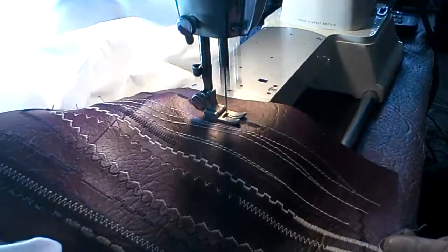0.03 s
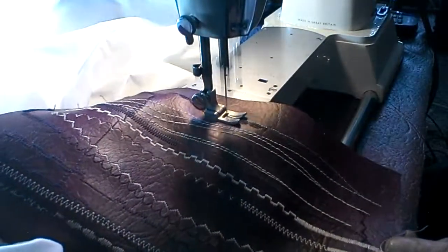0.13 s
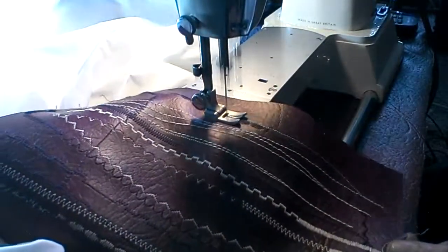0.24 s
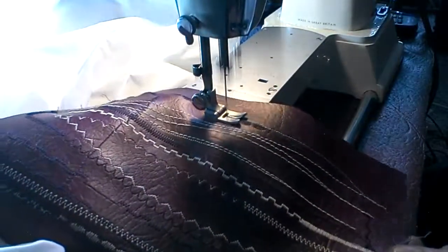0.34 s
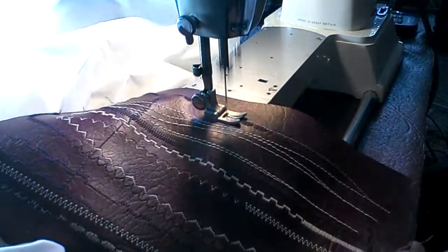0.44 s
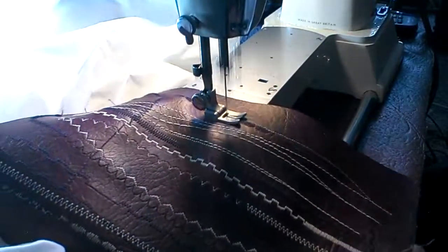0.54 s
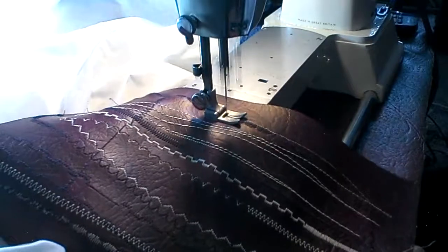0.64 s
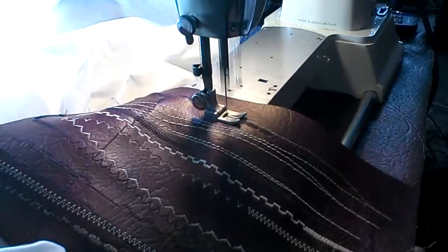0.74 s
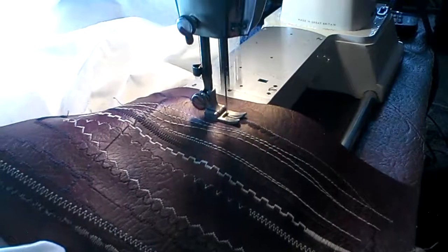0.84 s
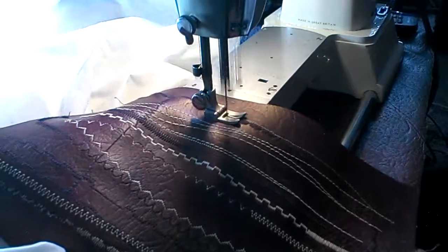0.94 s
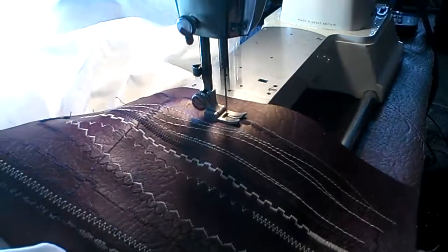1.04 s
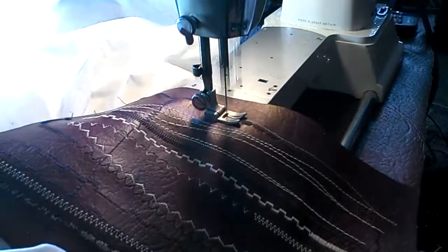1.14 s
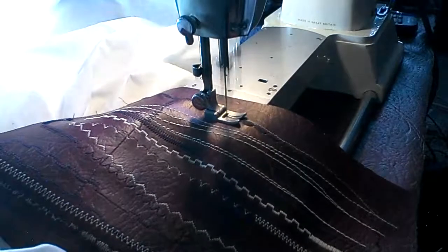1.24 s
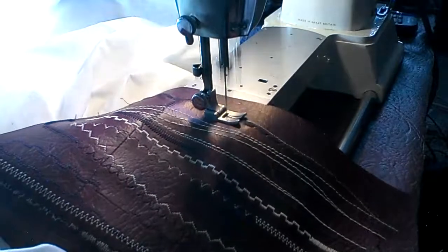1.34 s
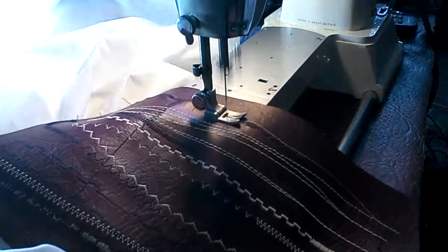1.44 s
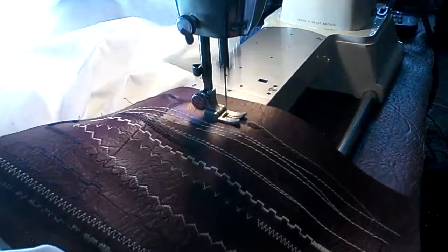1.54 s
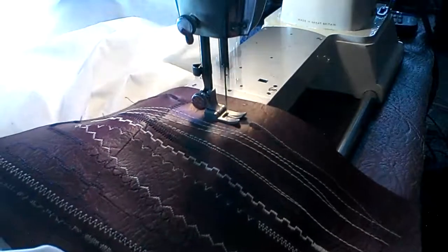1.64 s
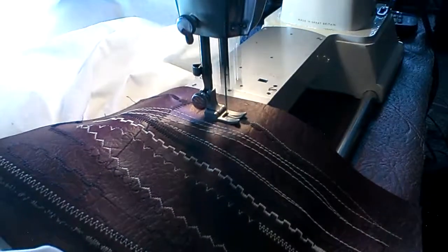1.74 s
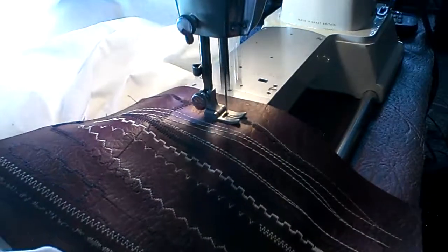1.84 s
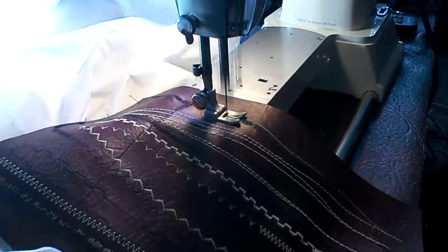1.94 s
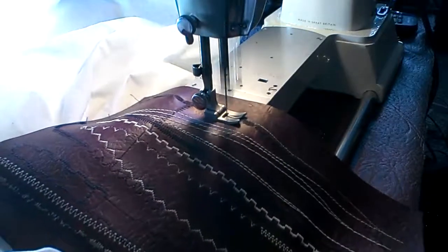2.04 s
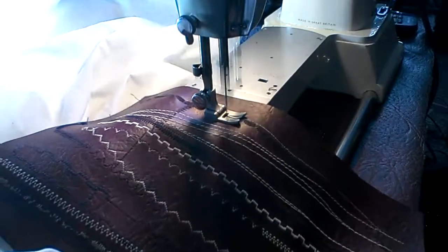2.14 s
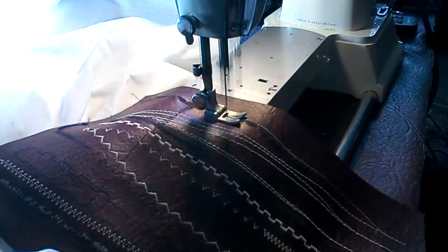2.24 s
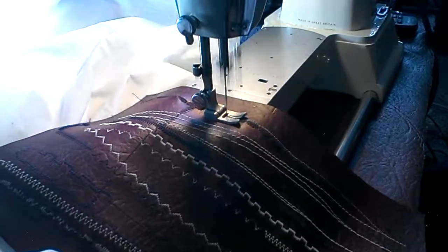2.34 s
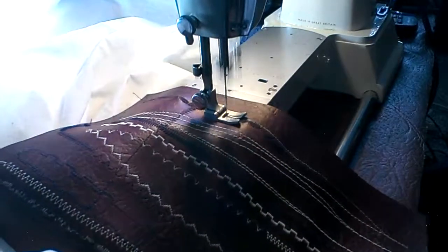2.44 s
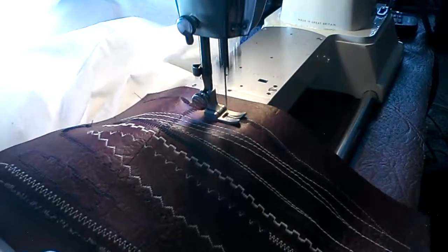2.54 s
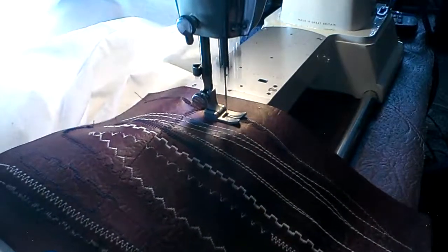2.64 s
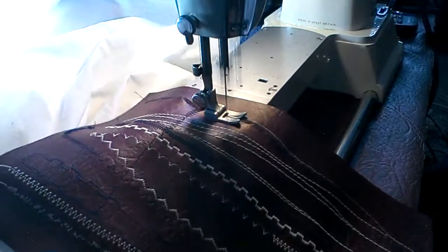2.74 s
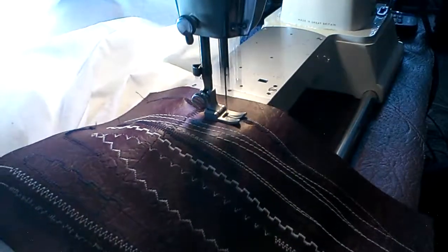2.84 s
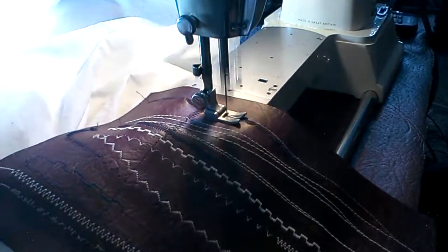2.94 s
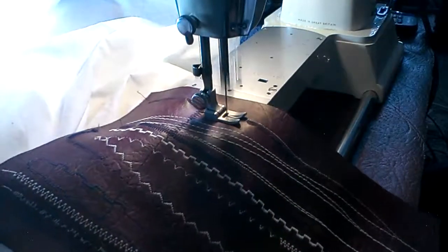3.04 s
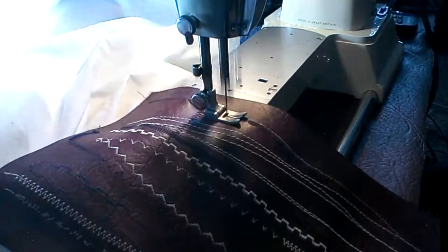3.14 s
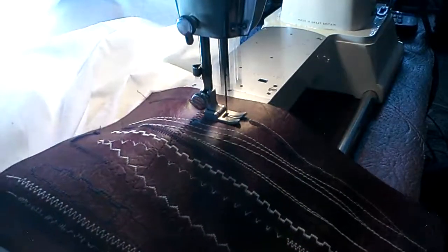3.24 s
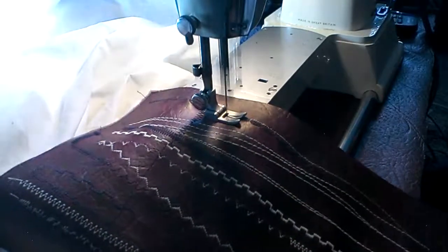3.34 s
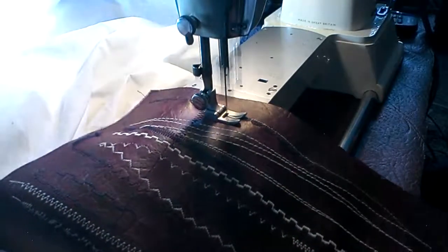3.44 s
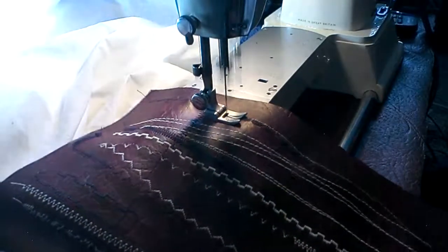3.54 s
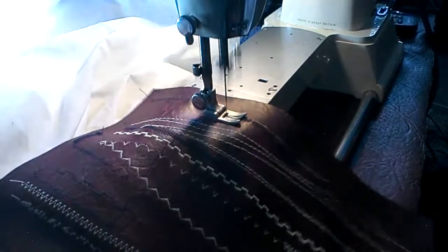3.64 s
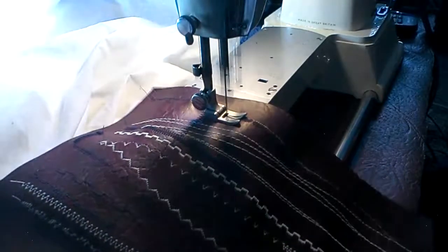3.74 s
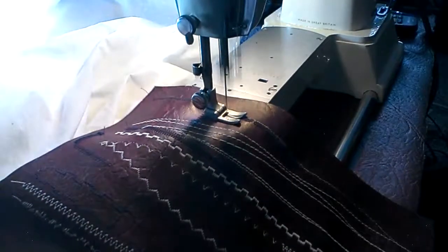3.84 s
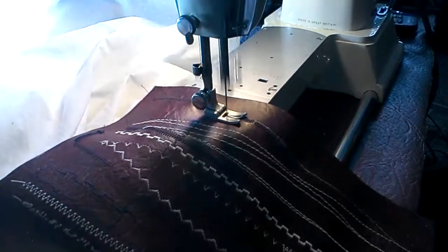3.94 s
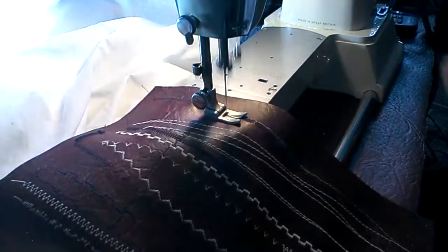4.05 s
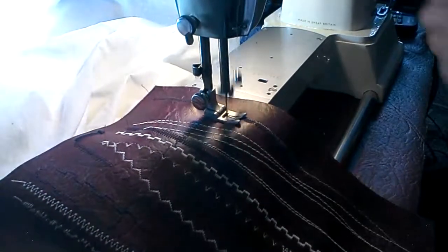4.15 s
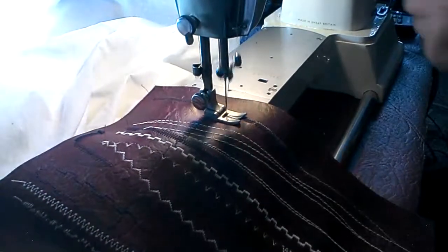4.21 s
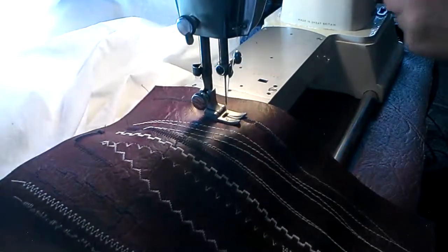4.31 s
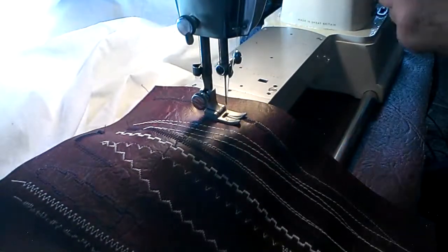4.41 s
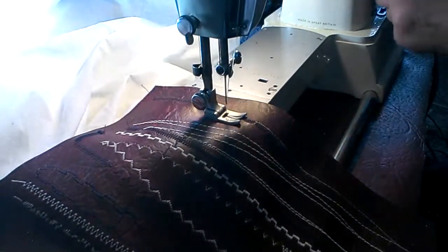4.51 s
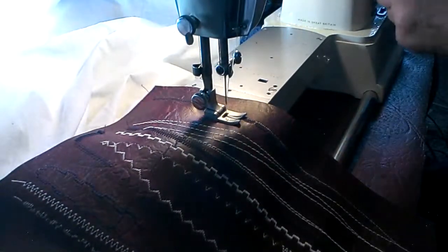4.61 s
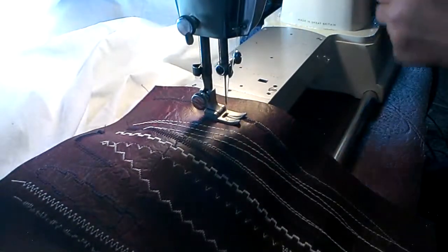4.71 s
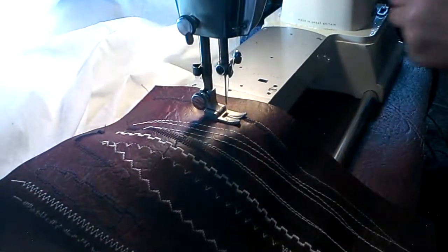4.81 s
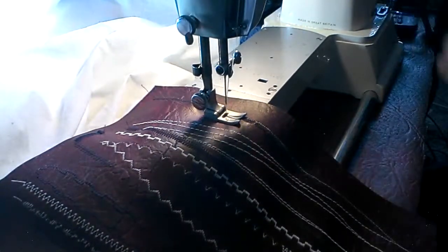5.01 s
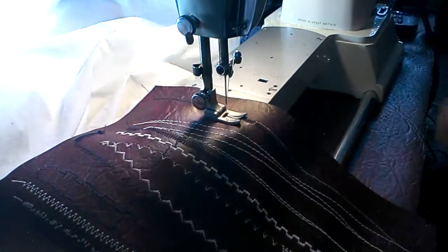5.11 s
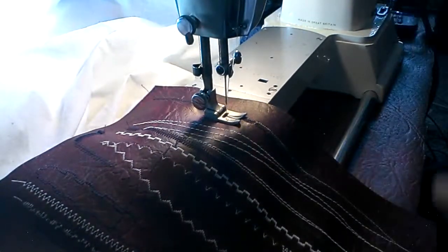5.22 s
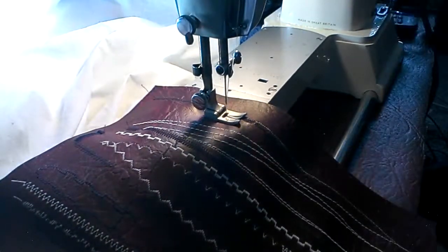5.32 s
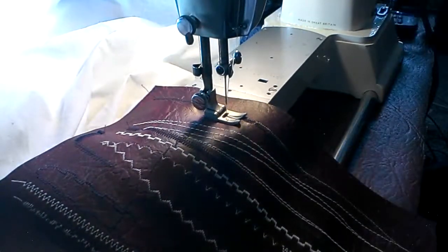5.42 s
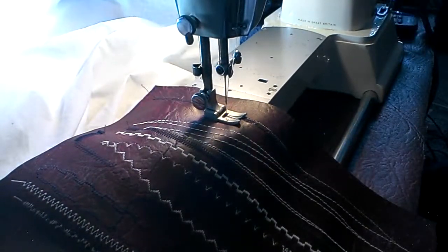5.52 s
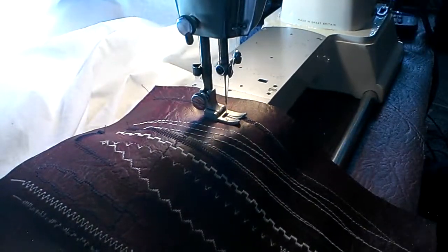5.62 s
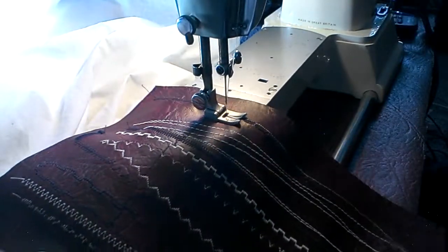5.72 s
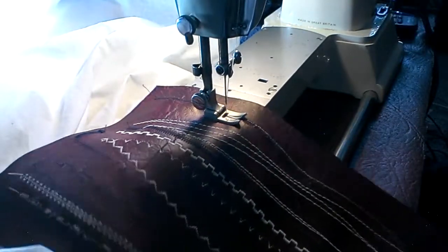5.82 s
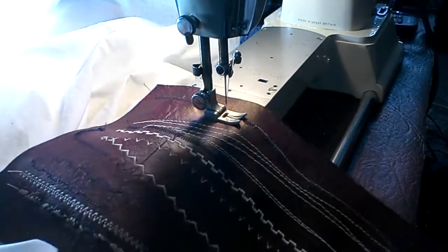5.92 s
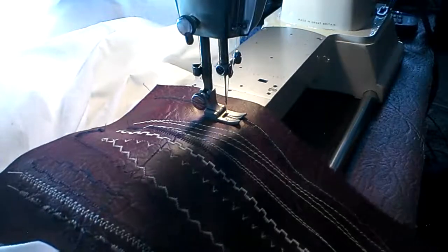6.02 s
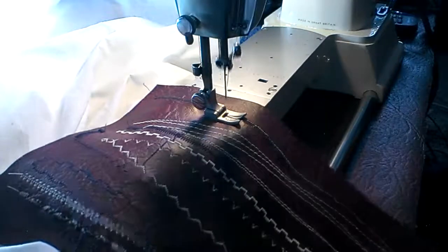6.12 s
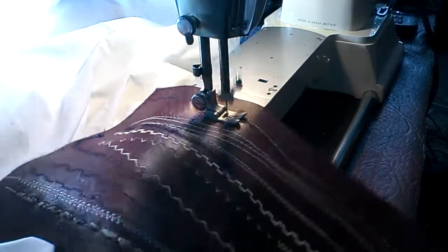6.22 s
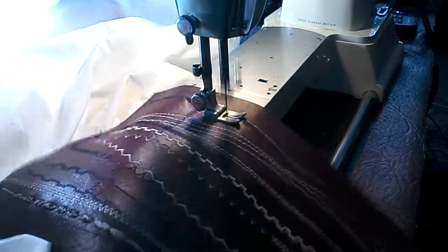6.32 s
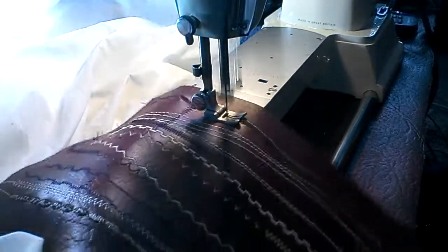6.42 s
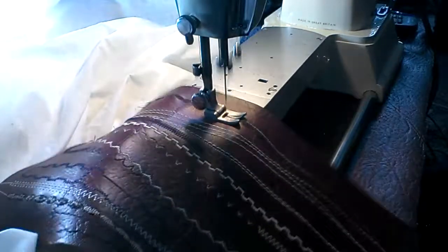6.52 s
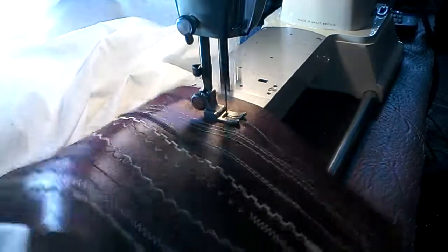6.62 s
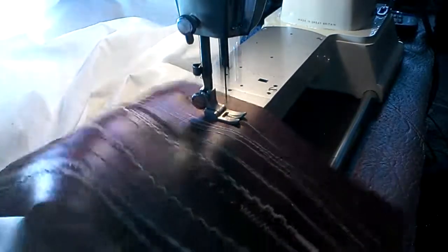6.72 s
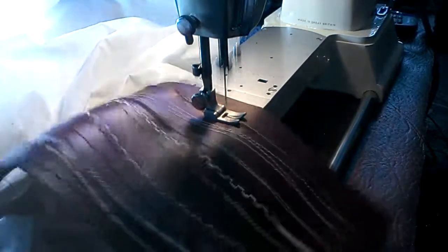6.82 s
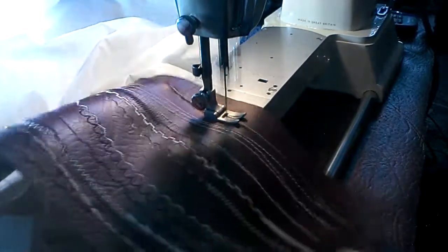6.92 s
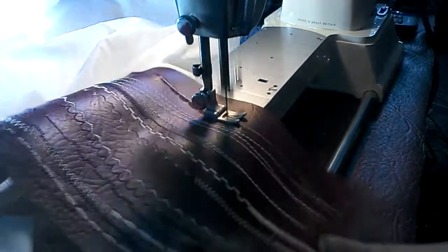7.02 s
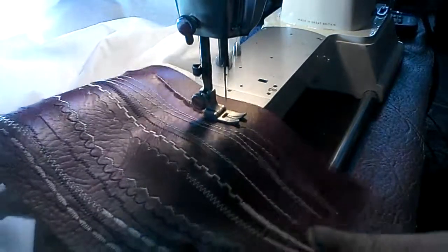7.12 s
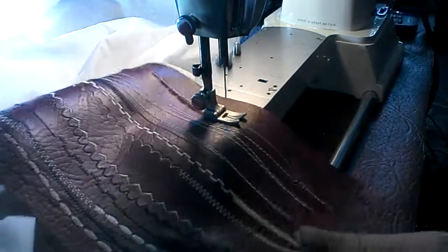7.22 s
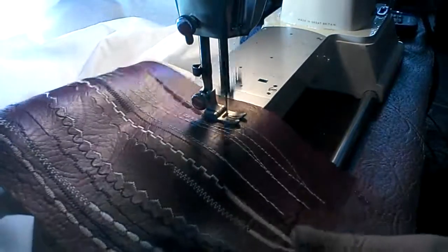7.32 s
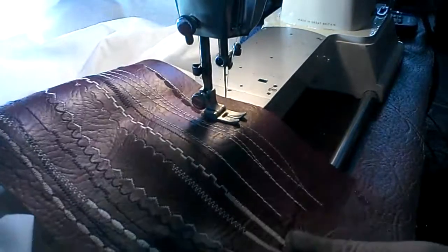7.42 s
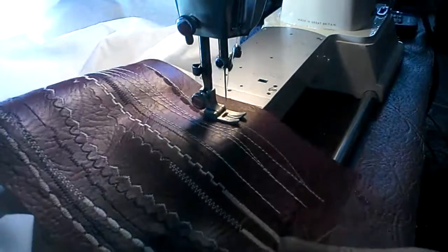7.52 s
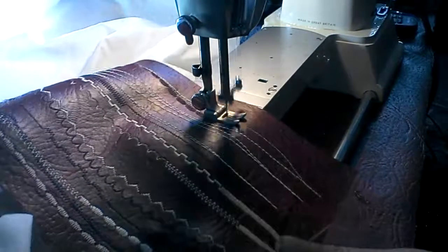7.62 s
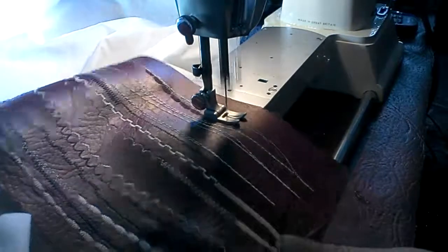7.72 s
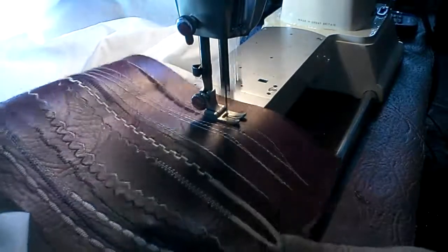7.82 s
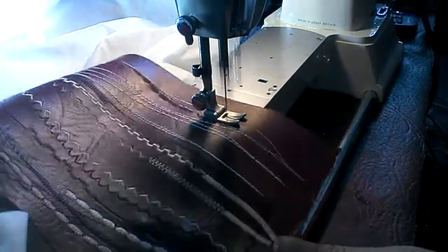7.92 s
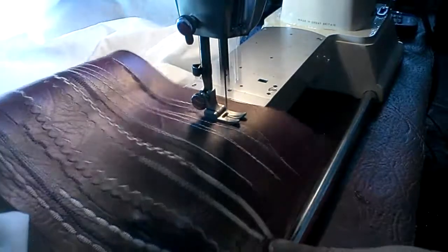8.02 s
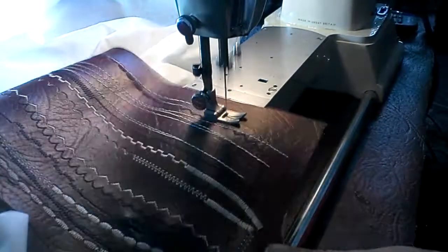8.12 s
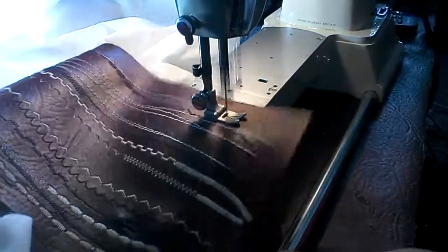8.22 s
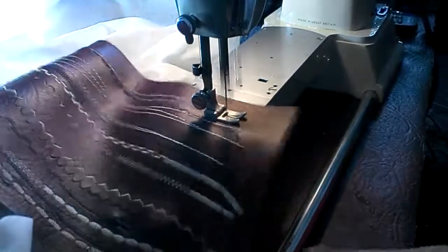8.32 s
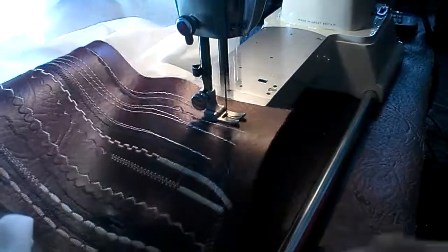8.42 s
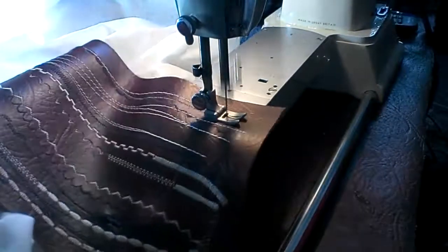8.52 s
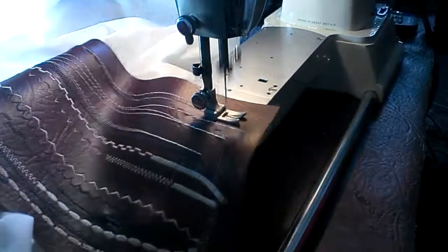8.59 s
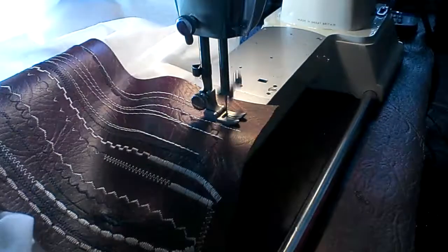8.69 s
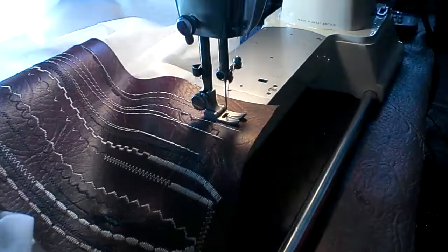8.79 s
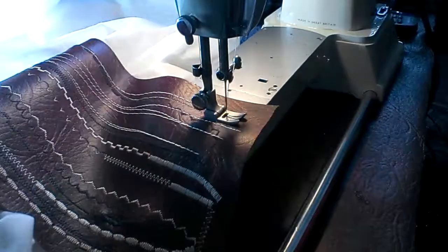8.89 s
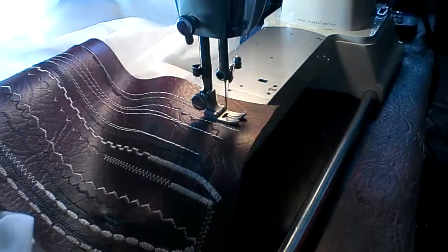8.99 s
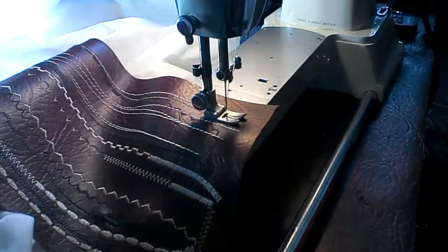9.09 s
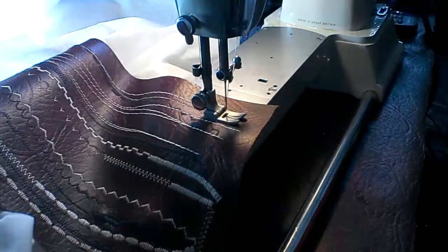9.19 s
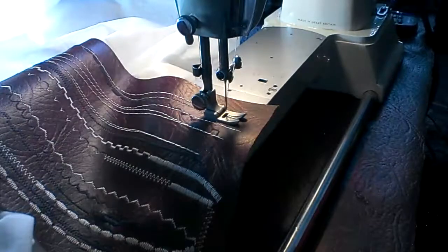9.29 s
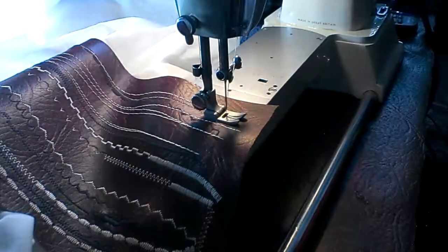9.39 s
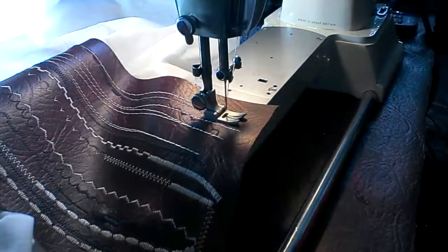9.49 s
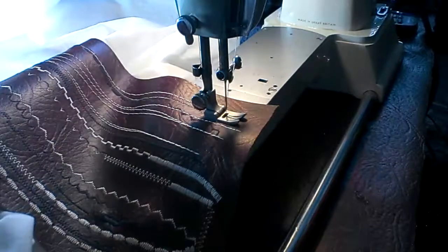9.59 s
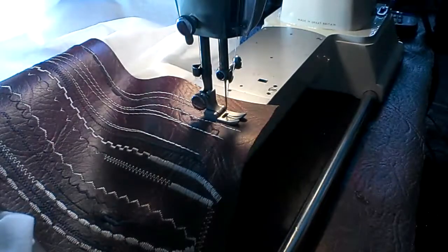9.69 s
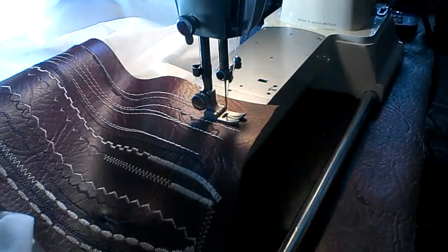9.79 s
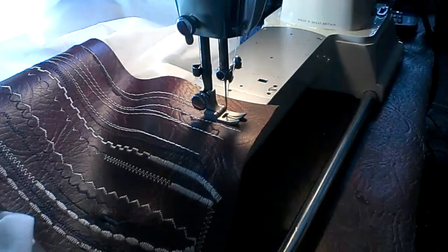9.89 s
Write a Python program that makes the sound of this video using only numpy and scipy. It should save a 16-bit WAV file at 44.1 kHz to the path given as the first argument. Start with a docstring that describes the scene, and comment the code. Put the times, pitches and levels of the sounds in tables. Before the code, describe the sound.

A home sewing machine stitches leather with a fast, even metallic clatter, whirring gears and a low shake through the table. It slows and stops, and a few small clicks sound in the pause. Then it runs two short bursts, each speeding up and winding down, ending with a light knock. The microphone is close, in a small room with soft hiss and faint distant traffic.

```python
"""In a small room, a home sewing machine on a table stitches leather: one long run, clicks while it
rests, then two short bursts. Each turn of the shaft works the needle, the feed and the thread lever;
their blows ring the metal housing and knock the table. Gears whirr and the motor shakes with the speed.
Behind it are a soft hiss, far traffic and a far engine. One close microphone hears it all."""
import sys
import numpy as np
from scipy import signal
from scipy.fft import rfft, irfft
from scipy.io import wavfile
from scipy.ndimage import uniform_filter1d

SR = 44100
rng = np.random.default_rng(int(sys.argv[2]) if len(sys.argv) > 2 else 0)


def put_to_file(sound):
    """Save the sound as 16-bit audio at rate SR, in the file named by the first command-line argument."""
    columns = np.atleast_2d(sound).T  # one column per channel
    safe = np.clip(columns, -1, 1)
    whole_steps = np.round(safe * 32767)
    wavfile.write(sys.argv[1], SR, whole_steps.astype(np.int16))


N = 438778
TIME = np.arange(N) / SR

# tone colours of room hiss, traffic, gears, lever and a blow's bright snap (f/Hz, relative level/dB)
HISS_COLOUR = [(30, 3.5), (50, 5), (75, 3), (110, -8.5), (280, -6.5), (400, -11), (620, -15.5), (1000, -18),
               (2500, -17), (3200, -13.5), (4300, -9.5), (6000, -12.5), (7500, -14), (10000, -31),
               (16000, -23.5)]
TRAFFIC_COLOUR = [(30, -22), (140, -3.5), (300, -5.5), (480, -15.5), (950, -8), (2000, -18.5), (4000, -56)]
GEAR_COLOUR = [(200, -7), (500, 1.5), (850, -4), (1200, -1.5), (2000, -2.5), (3000, -2), (4700, -2),
               (6500, -5), (9000, -11.5), (12000, -12.5), (16000, -12)]
LEVER_COLOUR = [(400, -33), (1300, -22), (1750, -13), (2050, -13), (2400, 1.5), (2850, 1), (3300, -7.5),
                (4300, -3), (5200, -0.5), (6100, -10), (7100, -16), (9000, -25), (16000, -26)]
SNAP_COLOUR = [(500, 3), (2000, -5.5), (5000, -3), (7200, 2), (8500, -11), (9800, 2), (11500, -12),
               (16000, -4)]
# ringing notes of the table top, machine base and metal housing (f/Hz, width/Hz, relative level/dB)
TABLE_NOTES = [(103, 17, -10), (129.4, 20.6, -1.5), (152.5, 14.6, -3.5), (199, 42, -14.5)]
BASE_NOTES = [(261.4, 14, -9), (402.8, 38, -0.5), (449.5, 59, -0.5), (526.6, 50.4, 1), (640, 64, -7.5)]
HOUSING_NOTES = [(1156, 108, -2), (1324, 73, -1), (1762, 198, -2.5), (2213, 160, -4.5), (2610, 227, -2.5),
                 (3122, 170, -1.5), (3677, 160, 3), (4337, 287, 3), (4940, 185, 5.5), (5520, 445, 0),
                 (6130, 720, -6.5), (7000, 420, -19), (7980, 150, -13.5), (9770, 200, -18.5)]
# rumble of far traffic (t/s, level/dB)
TRAFFIC_LEVEL = [(0, -71), (4.5, -71), (6, -69.5), (8.8, -64.5), (9.3, -64.5), (9.95, -65.5)]
# swells of the far engine (middle t/s, length/s, f/Hz, glide/(Hz per s), level/dB, octave level/dB)
ENGINE_SWELLS = [(1.301, .9, 72, 10, -51, -80), (2.121, .65, 72, -28, -47.5, -80),
                 (2.549, .8, 58, -32, -54, -80), (3.651, .9, 71, 8, -55.5, -80),
                 (4.5, .9, 77, 3, -61.5, -70), (6.551, .5, 65, 2, -55.5, -80),
                 (7.549, 1.6, 64.5, 1.5, -55, -72), (8.898, .9, 76, 0, -74, -62.5),
                 (9.753, 1.1, 68, -6, -80, -66.5)]
# short pings from the machine (t/s, f/Hz, width/Hz, level/dB)
PINGS = [(5.559, 2000, 45, -39), (5.824, 1950, 45, -37), (6.815, 1100, 70, -18), (6.873, 1080, 70, -16)]
# single clicks of levers and links (t/s, lever level/dB, housing level/dB, relative knock level/dB)
CLICKS = [(4.181, -60, -48, -16), (4.752, -56, -56, -15.5), (4.7929, -33, -46, -26), (6.149, -39, -48, -21),
          (6.19, -46, -49, -14.5), (7.563, -46, -43, -16.5), (7.681, -60, -38, -21),
          (8.723, -51, -39.5, -15), (8.938, -66, -51.5, -33)]
# pedal presses, the first already under way
# (down t/s, up t/s, top speed/(turns per s), coasting time/s, starting angle/turns)
PEDAL = [(-3, 3.7156, 20.8165, .715, .041), (6.1676, 7.0385, 19.445, .575, .019),
         (7.599, 8.3364, 19.3, .616, .267)]
# slight drift of the top speed (t/s, added speed/(turns per s))
SPEED_DRIFT = [(0, 0), (1.6, .2), (2.5, -.052), (3.7, -.046)]
# strength of the sharp mid-turn blow, probably the thread pulling tight (t/s, relative level/dB)
THREAD_TENSION = [(0, -1), (1.5, -.5), (3.3, 2), (4, -3), (6.4, -3), (7, 0.5), (7.8, -3), (8.4, 2)]
# blows in one turn of the shaft, with relative levels
# (angle/turns, rattle time/ms, clack level/dB, part f/Hz, part level/dB, snap level/dB, knock level/dB)
BLOWS_PER_TURN = [(-.02, 1.85, -35, 3670, -19.5, -43, -24), (.015, 1.799, -28.5, 5820, -24.5, -49, 0),
                  (.133, 1.804, -40.5, 2310, -27.5, -53, -19), (.218, 1.73, -38, 1720, -34.5, -53, -13),
                  (0.404, 1.2, -27.5, 3854, -18.5, -33, -5), (0.452, 1.59, -42.5, 2470, -27, -50, -13),
                  (.549, 2.99, -35.5, 4700, -23, -55, -12.5)]

LOAD_DB = -.68  # how hard the leather makes the machine work


def undb(db):
    """Turn decibels into a gain."""
    return 10 ** (np.asarray(db) / 20)


def unit(x):
    """Scale to an average power of 1."""
    return x / np.sqrt(np.mean(x ** 2))


def curve(table):
    """Join (time, value) points with straight lines."""
    return np.interp(TIME, *np.transpose(table))


def noise():
    """White noise."""
    return rng.standard_normal(N)


def wander(per_s):
    """A smooth random wobble of size about 1."""
    hold = int(SR / per_s)
    steps = np.repeat(rng.standard_normal(N // hold + 1), hold)
    return unit(uniform_filter1d(uniform_filter1d(steps, hold), hold)[:N])


def convolve(x, response):
    """Filter by a response scaled to an energy of 1."""
    return signal.fftconvolve(x, response / np.linalg.norm(response))[:N]


def colour(x, points, size=4096):
    """Give a sound the tone colour drawn by (Hz, dB) points."""
    hz, db = np.transpose(points)
    log_hz = np.log(np.fft.rfftfreq(size, 1 / SR) + 1)
    log_gain = np.log(undb(np.interp(log_hz, np.log(hz), db)))
    cepstrum = irfft(log_gain)[:size // 2]
    cepstrum[1:] *= 2  # so nothing sounds before its cause
    return convolve(x, irfft(np.exp(rfft(cepstrum, size))))


def ring(x, notes, size=8192):
    """Ring an object's notes: wider ones die sooner, and neighbours swing opposite ways."""
    t = TIME[:size]
    response = sum((-1) ** k * undb(db) * width * np.exp(-np.pi * width * t) * np.sin(2 * np.pi * hz * t)
                   for k, (hz, width, db) in enumerate(notes))
    return convolve(x, response)


def blows(times, sizes):
    """One sharp spike at each time."""
    return np.bincount(np.clip(times * SR, 0, N - 1).astype(int), sizes, N)


def passes(turns, angle):
    """The samples at which the shaft passes an angle."""
    return np.flatnonzero(np.diff(np.floor(turns - angle)) > 0)


def chatter(hits, ms, loose, shrink=.72, count=7, size=1024):
    """Metal parts meet in ever quicker, weaker bounces; loose (0 to 1) mixes in random rattle."""
    k = np.arange(count)
    lags = np.minimum(2 * ms * (1 - shrink ** k) * SR / 1000, size - 1)
    bounces = np.bincount(lags.astype(int), (-shrink) ** k, size)
    age = TIME[:size] * 1000 / ms
    flurry = 2 * age * np.exp(1 - 2 * age)
    bounces *= np.linalg.norm(flurry) / np.linalg.norm(bounces)
    regular = signal.oaconvolve(hits, bounces)[:N]
    rattle = signal.oaconvolve(hits, flurry)[:N] * noise()
    return np.sqrt(1 - loose ** 2) * regular + loose * rattle


def room(x, fade_s, echo_db):
    """A small furnished room adds a short wash of echoes that falls 60 dB in fade_s."""
    t = TIME[:SR // 2]
    tail = rng.standard_normal(len(t)) * undb(-60 * t / fade_s) * (t > .004)
    reflected = colour(x, [(100, -2), (600, 2), (2500, -3.5), (6000, -.5), (9000, 5.5), (16000, -17.5)])
    return x + undb(echo_db) * convolve(reflected, tail)


def far_engine(idle_hz=71.9, idle_db=-68.5):
    """An engine outside idles unevenly; now and then it swells and fades while its pitch glides."""
    idle_level = undb(idle_db + 3 * wander(5.1))
    idle_pitch = idle_hz * (1 + .0296 * wander(11))
    drone = idle_level * np.sin(2 * np.pi * np.cumsum(idle_pitch) / SR)
    wobble, flutter = 1 + .012 * wander(11), undb(2.2 * wander(8.6))
    for middle, length, hz, glide, db, octave_db in ENGINE_SWELLS:
        on = np.abs(TIME - middle) < length / 2
        t = TIME[on] - middle
        phase = 2 * np.pi * np.cumsum((hz + glide * t) * wobble[on]) / SR
        tone = undb(db) * np.sin(phase) + undb(octave_db) * np.sin(2 * phase)
        drone[on] += np.cos(np.pi * t / length) ** 2 * flutter[on] * tone
    return np.sqrt(2) * drone


def background(hiss_db=-60.5, treble_db=-67):
    """Soft hiss with a flickering treble, far traffic and the engine outside."""
    hiss = colour(noise(), HISS_COLOUR) * undb(hiss_db + .5 * wander(1.93))
    treble = ring(noise(), [(3570, 670, -.33), (4620, 860, -2)]) * undb(treble_db + 2 * wander(23))
    traffic = colour(noise(), TRAFFIC_COLOUR) * undb(curve(TRAFFIC_LEVEL))
    return hiss + treble + traffic + far_engine()


def pings():
    """Short pings from the machine: two faint high ones at rest, two lower ones on stitches in a row."""
    return sum(ring(blows(np.array([t]), [undb(db)]), [(hz, width, 0)]) for t, hz, width, db in PINGS)


def clicks(bounce_s=.0018):
    """A small lever snaps over and bounces once; loose links tick in the housing and knock the base."""
    t, lever_db, housing_db, knock_db = np.transpose(CLICKS)
    hits = blows(t, undb(lever_db)) + .88 * blows(t + bounce_s, undb(lever_db))
    lever = colour(chatter(hits, ms=1.634, loose=.74), LEVER_COLOUR)
    links = ring(chatter(blows(t, undb(housing_db)), ms=2.2, loose=.98), HOUSING_NOTES)
    knock = ring(blows(t, undb(knock_db - 16)), BASE_NOTES)
    return lever + links + knock


def shaft(full_turns_per_s=23.37, spin_up_s=.302, drag_share=.3, bind_share=.2):
    """The pedal spins the shaft up, then lets it coast. Gives turns and speed (1 is full speed)."""
    drift = curve(SPEED_DRIFT)
    turns, total_rate = np.zeros(N), np.zeros(N)
    for down, up, top, coast_s, angle in PEDAL:
        run_up = 1 - np.exp(-np.maximum(TIME - down, 0) / spin_up_s)
        coast_left = np.clip(1 - (TIME - up) / coast_s, 0, 1)
        # dry rubbing brakes it, along with a drag that grows with speed
        braking = coast_left * (1 - drag_share * (1 - coast_left))
        # near the end the parts bind and stop dead
        free = uniform_filter1d(1. * (coast_left > bind_share), size=900)
        rate = (top + drift) * run_up * braking * free
        turns = np.where(TIME >= down, angle + np.cumsum(rate) / SR, turns)
        total_rate += rate
    return turns, total_rate / full_turns_per_s


def motor(turns, speed, pulley_ratio=7.52, shaky_speed=.777, shaky_width=.089):
    """The motor and swinging needle bar shake the table, most at the speed where the mount resonates."""
    shake = speed / (1 + ((speed - shaky_speed) / shaky_width) ** 2)
    phase = 2 * np.pi * turns
    hum = undb(-71) * np.sin(pulley_ratio * phase + .7 * wander(12)) * shake
    at = passes(turns, .7)
    thumps = undb(-22) * blows(TIME[at], speed[at] ** 2)
    rumble = undb(-58) * noise() * (speed + 1.25 * shake)
    sway = sum(undb(db) * np.sin(per_turn * phase) for per_turn, db in [(1, -55), (2, -57), (7, -55)])
    return ring(thumps + hum + rumble, TABLE_NOTES) + sway * speed ** 2


def gears(speed):
    """Gears rub and rattle all through the turn, louder with speed."""
    rub = colour(noise() * speed * undb(2 * wander(300)), GEAR_COLOUR)
    rattle = ring(unit(noise() * undb(3 * wander(700))) * speed, HOUSING_NOTES)
    return undb(-43.5) * rub + undb(-46) * rattle


def hook(speed):
    """The thread hook slides round its track and sings near one pitch."""
    sliding = noise() * speed ** .89 * undb(1.8 * wander(120))
    return undb(-47) * ring(sliding, [(4510, 140, -2), (4890, 170, 2)])


def belt(speed):
    """The belt rasps at low speed, most while it pulls the machine faster."""
    pull = np.clip(uniform_filter1d(np.gradient(speed) * SR, size=12000), 0, 1)
    slow = np.clip(2.5 * (.85 - speed), 0, 1)
    rasp = noise() * (.68 + .6 * pull) * speed ** .87 * slow
    return undb(-51) * ring(rasp, [(1747, 115, 4.5), (1030, 400, -3.5)])


def gear_teeth(turns, speed, points=160):
    """The same uneven teeth come round on every turn and hum in the base, over a soft rumble."""
    bumps = unit(irfft(np.exp(2j * np.pi * rng.random(points // 2 + 1))))
    teeth = np.interp(turns, np.arange(points) / points, bumps, period=1)
    return ring((undb(-60) * noise() + undb(-63) * teeth) * speed, BASE_NOTES)


def stitches(turns, speed, scatter_db=.5, jitter_ms=.1, part_width_hz=380):
    """Each blow rings its own part, clacks in the housing, snaps brightly and knocks the base."""
    clack = parts = snap = knock = 0
    smear = .39 * np.clip(1 - speed, 0, 1)  # slow strokes rattle longer
    for angle, ms, clack_db, part_hz, part_db, snap_db, knock_db in BLOWS_PER_TURN:
        at = passes(turns, angle)
        jitter, force = rng.standard_normal((len(at), 2)).T
        # the needle must pierce the leather at any speed; other parts hit by their momentum
        is_needle = abs(angle) < .1
        speed_power, loose = (.81, .5) if is_needle else (1.12, .35)
        sizes = speed[at] ** speed_power * undb(LOAD_DB)
        if .38 < angle < .43:  # the thread lever's blow
            sizes *= undb(curve(THREAD_TENSION)[at])
        times = TIME[at] + (jitter * jitter_ms - ms / 2) / 1000
        hits = blows(times, sizes * undb(scatter_db * force))
        clack += undb(clack_db) * (chatter(hits, ms, loose) + smear * chatter(hits, 2 * ms, loose=1))
        parts += undb(part_db) * ring(hits, [(part_hz, part_width_hz, 0)], size=512)
        snap += undb(snap_db) * chatter(hits * np.sqrt(speed), ms, loose=1)
        knock += undb(knock_db - 15) * blows(TIME[at], sizes * speed[at] ** .52)
    return ring(clack, HOUSING_NOTES) + parts + colour(snap, SNAP_COLOUR) + ring(knock, BASE_NOTES)


def scene():
    """The machine, its clicks and pings, and the background, the same in both channels."""
    turns, speed = shaft()
    stitching = stitches(turns, speed)
    whirr = undb(LOAD_DB) * (gears(speed) + hook(speed) + belt(speed) + gear_teeth(turns, speed))
    machine = room(stitching + whirr + motor(turns, speed), fade_s=.37, echo_db=-10)
    small_sounds = room(clicks() + pings(), fade_s=.21, echo_db=-7.5)
    return np.tile(background() + small_sounds + machine, (2, 1))


def record(dry, hiss_db=-68, top_hz=15850):
    """Both channels carry the one microphone, each with its own faint hiss; the highest treble is cut."""
    hiss = undb(hiss_db) * rng.standard_normal(dry.shape)
    low_pass = signal.ellip(10, .2, 70, top_hz, fs=SR, output="sos")
    return signal.sosfilt(low_pass, dry + hiss)


dry = scene()
out = record(dry)
put_to_file(out)
```